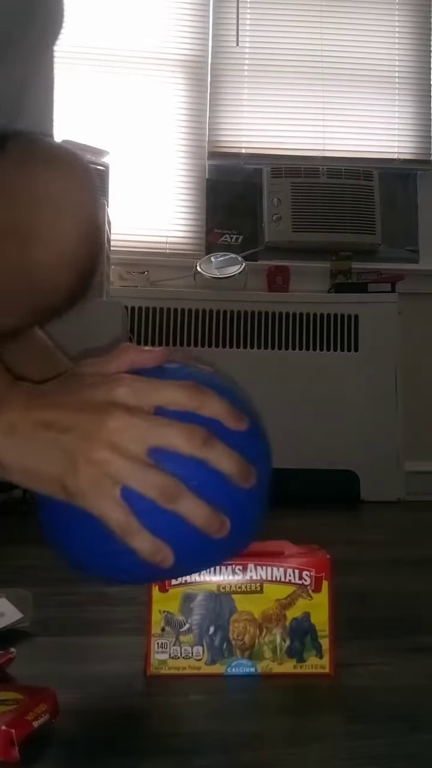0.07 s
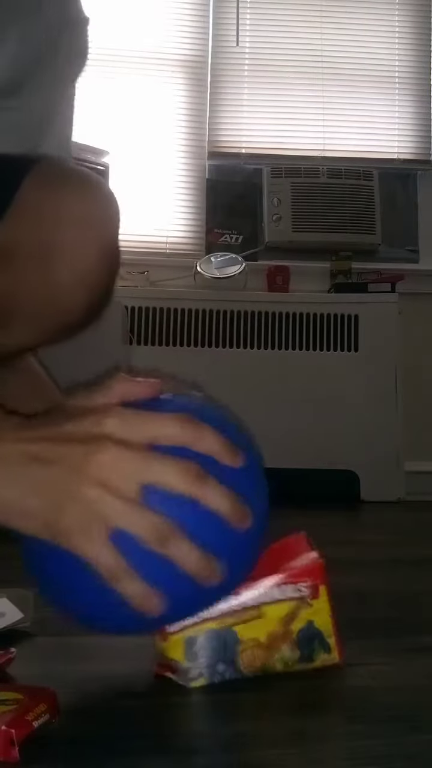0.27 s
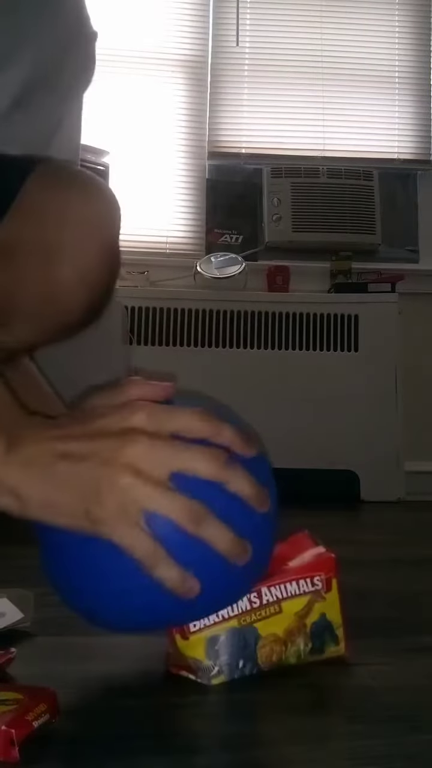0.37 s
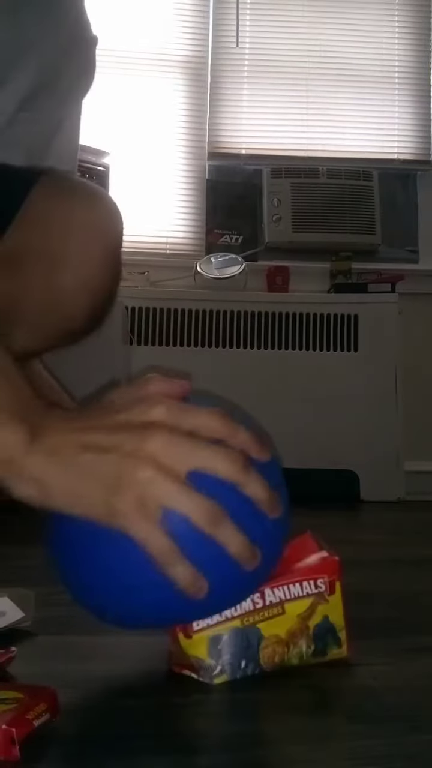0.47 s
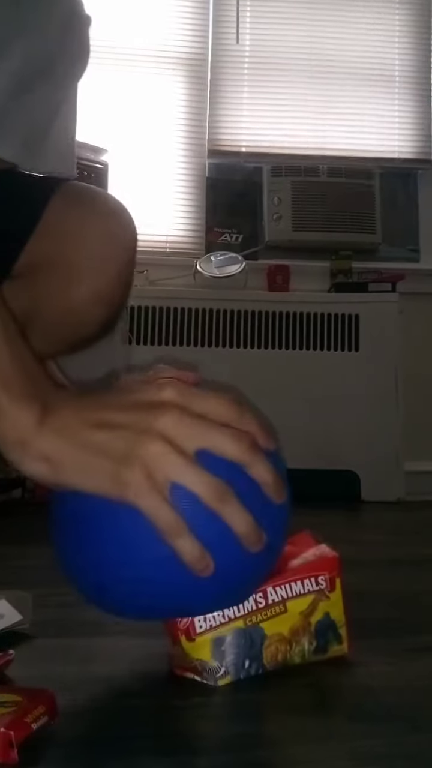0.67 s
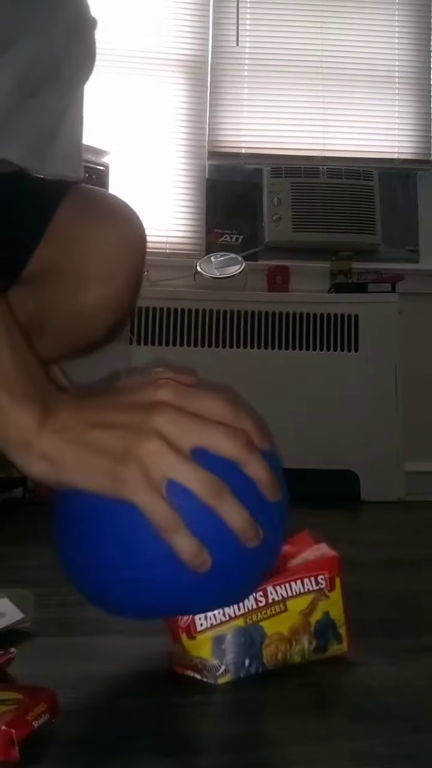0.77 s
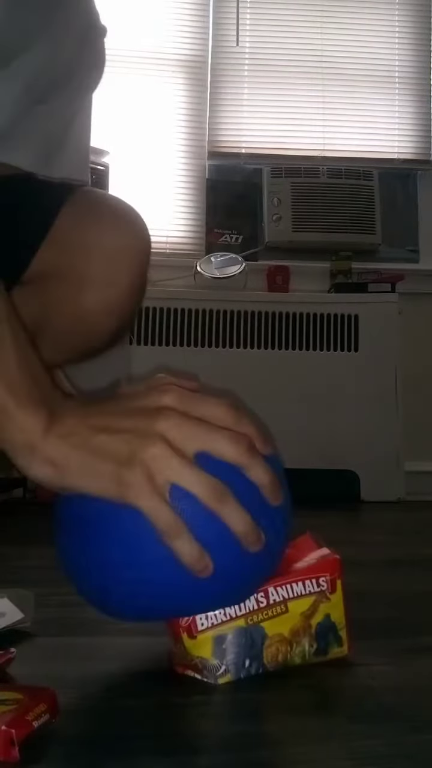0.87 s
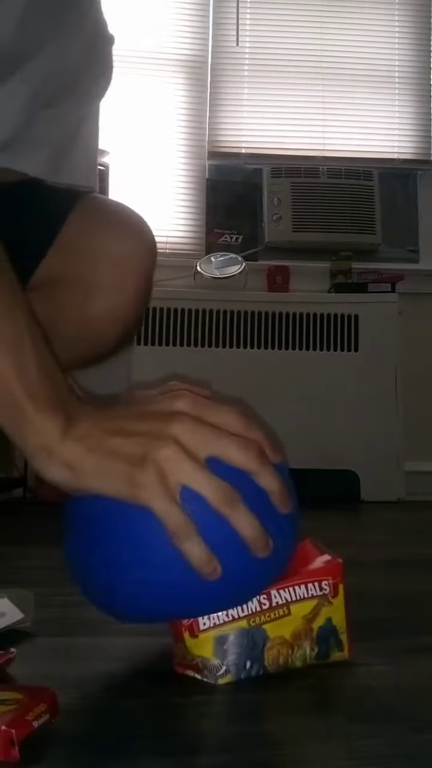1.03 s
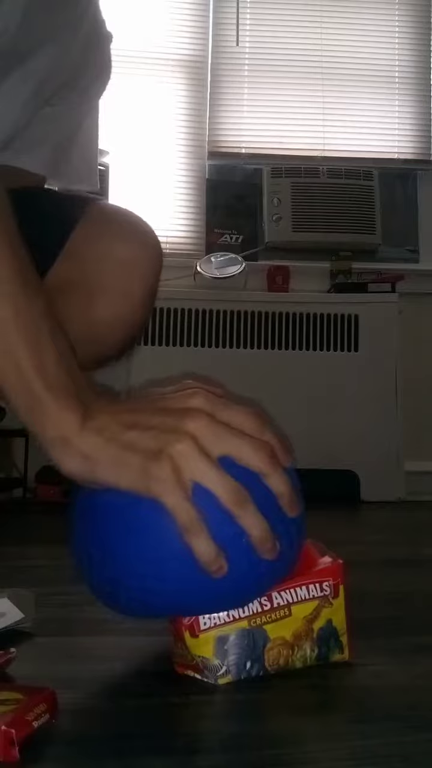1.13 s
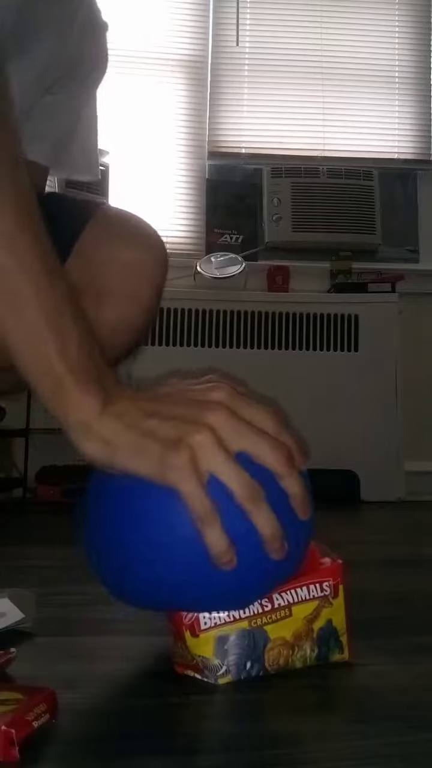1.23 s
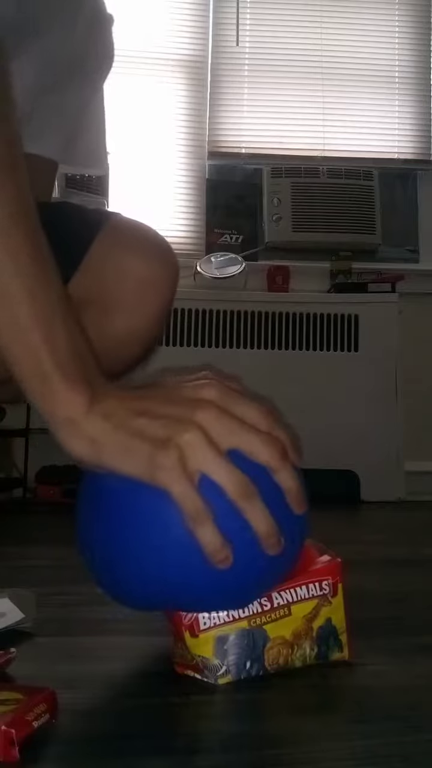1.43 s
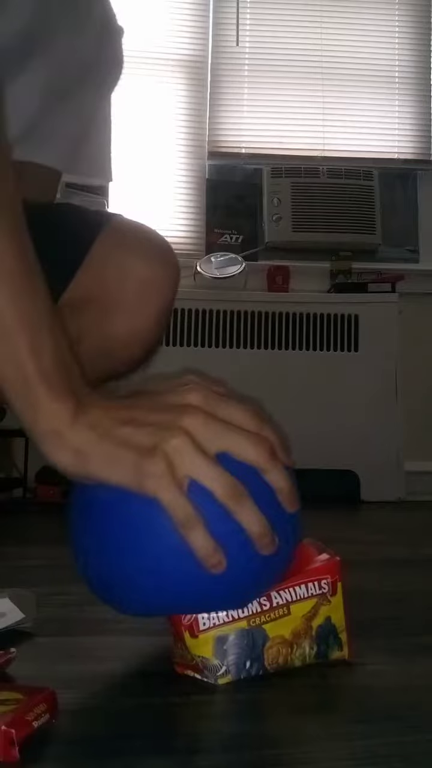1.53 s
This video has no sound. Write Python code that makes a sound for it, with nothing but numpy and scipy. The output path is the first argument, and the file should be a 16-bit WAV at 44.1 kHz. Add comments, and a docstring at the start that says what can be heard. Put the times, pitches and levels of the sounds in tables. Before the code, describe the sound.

A small cardboard box buckles under a rubber ball, close by, with a quick cluster of hollow thumps and crackling creases from about 0.2 to 0.5 seconds. It knocks lightly on the hard floor at 0.6 seconds. The ball bumps it softly just after 1 second, and a stiff flap snaps with small ticks around 1.25 seconds. An air conditioner hums faintly throughout in the small room.

```python
"""A small cardboard box buckles under a rubber ball, close by on a hard floor in a small room.
Its panels give way with hollow thumps while breaking fibres crackle along the creases.
The box tips and knocks on the floor; later the ball bumps it, and a stiff flap slips and snaps.
Behind it all, an air conditioner hums faintly."""
import sys
import numpy as np
from scipy import signal
from scipy.fft import rfft, irfft
from scipy.io import wavfile
from scipy.ndimage import uniform_filter1d

SR = 44100
rng = np.random.default_rng(int(sys.argv[2]) if len(sys.argv) > 2 else 0)


def waveform_to_disk(signal):
    """Save audio, clipped to [-1, 1], as 16-bit WAV at the path in sys.argv[1]."""
    frames = np.transpose(np.atleast_2d(signal))
    scaled = np.clip(frames, -1, 1) * 32767
    samples = np.round(scaled).astype(np.int16)
    wavfile.write(sys.argv[1], SR, samples)


N = 70560
TIME = np.arange(N) / SR


def from_db(db):
    """Decibels to gain."""
    return 10 ** (np.asarray(db) / 20)


def rms_one(x):
    """Scale to rms 1."""
    return x / np.sqrt(np.mean(x ** 2) + 1e-20)


def at_hz(points, hz):
    """Read a curve on a log-frequency axis."""
    f, value = np.transpose(points)
    return np.interp(np.log(np.maximum(hz, 1)), np.log(f), value)


def butter(x, hz, kind, order=2):
    """Causal Butterworth filter."""
    sections = signal.butter(order, np.minimum(hz, .49 * SR), kind, fs=SR, output="sos")
    return signal.sosfilt(sections, x)


def convolve(x, response):
    """Pass a sound through an impulse response."""
    return signal.fftconvolve(x, response)[:N]


def colour(x, spectrum, size=4096):
    """Minimum-phase EQ with the given curve and unit power gain."""
    gains = from_db(at_hz(spectrum, np.fft.rfftfreq(size, 1 / SR)))
    cepstrum = irfft(np.log(gains))
    cepstrum[1:size // 2] *= 2
    cepstrum[size // 2 + 1:] = 0
    response = irfft(np.exp(rfft(cepstrum)))
    return convolve(x, response / np.linalg.norm(response))


def click(at_s):
    """A unit click at the given time."""
    return (np.arange(N) == int(at_s * SR)) + 1e-18


def ring(x, modes):
    """Resonators of alternating polarity; a unit click sets each ringing at its level."""
    out = np.zeros(N)
    for k, (hz, db, t60) in enumerate(modes):
        radius, angle = from_db(-60 / (t60 * SR)), 2 * np.pi * hz / SR
        poles = [1, -2 * radius * np.cos(angle), radius * radius]
        out += (-1) ** k * from_db(db) * signal.lfilter([0, np.sin(angle)], poles, x + 1e-18)
    return out


def swings(rows, rise):
    """A surface gives and springs back: one damped swing per row, its attack `rise` times its decay."""
    out = np.zeros(N)
    for at_s, db, hz, decay_cycles in rows:
        cycles = (TIME - at_s) * hz
        fade = np.maximum(cycles, -cycles / rise) / decay_cycles
        out += from_db(db) * np.sin(2 * np.pi * cycles) * np.exp(-np.minimum(fade, 50))
    return out


def air_conditioner(rush_db=-57, waver_depth=0.44, waver_hz=6.1):
    """A steady bed of rushing air with a few wavering motor tones."""
    # colour of the rush: f/Hz, relative level/dB
    rush_eq = [(25, -22), (45, -11), (65, -10), (115, -7.5), (200, 0.5), (320, -8.5), (420, -4), (520, -11),
               (670, -8.5), (950, -12.5), (1200, -13.5), (1700, -17.5), (2300, -18), (4800, -24.5),
               (8000, -36), (13900, -49.5)]
    # motor hum: f/Hz, rms level/dB
    motor_tones = [(119, -64.5), (176, -76), (238, -68.5), (665, -70.5), (856, -75.5), (1083, -69)]
    out = from_db(rush_db) * colour(rng.standard_normal(N), rush_eq)
    for hz, db in motor_tones:
        waver = rms_one(butter(rng.standard_normal(2 * N), waver_hz, "low")[N:])
        tone = np.sin(2 * np.pi * (hz * TIME + rng.random()))
        out += from_db(db) * rms_one((1 + waver_depth * waver) * tone)
    return out


def room(send, predelay_s=0.00088, build_s=0.0042, hold_s=0.05):
    """Diffuse reflections build up quickly, hold briefly and die away band by band."""
    # colour of the reverb: f/Hz, level/dB
    tail_eq = [(50, 0), (130, 0.5), (250, -2), (500, -0.5), (720, 0), (1000, -6.5), (1400, 0), (3000, -4),
               (6000, -0.5), (10000, -13.5), (13000, -5.5)]
    # reverb time: f/Hz, t60/s
    tail_t60 = [(60, 0.19), (150, 0.3), (600, 0.28), (2000, 0.27), (5000, 0.26), (13000, 0.074)]
    edges_hz = np.geomspace(40, 16000, 14)
    white, response = rng.standard_normal((2, N)), np.zeros(N)
    build = 1 - np.exp(-np.maximum(TIME - predelay_s, 0) / build_s)
    for k, (low, high) in enumerate(zip(edges_hz, edges_hz[1:])):
        hz = np.sqrt(low * high)
        decay = from_db(-60 * np.maximum(TIME - hold_s, 0) / at_hz(tail_t60, hz))
        tail = butter(white[k % 2], [low, high], "band") * build * decay
        gain = from_db(at_hz(tail_eq, hz)) * np.sqrt(2 * (high - low) / SR)
        response += gain * tail / np.linalg.norm(tail)
    return convolve(send, response)


def stereo_room(direct, send, width_db=-4.5, wide_above_hz=4670, scatter_s=.003):
    """Add reverb and air conditioner; all is centred, with only the treble scattered to the sides."""
    mid = direct + room(send) + air_conditioner()
    scatter = rng.standard_normal(N) * np.exp(-np.minimum(TIME / scatter_s, 50))
    diffuse = convolve(direct, scatter / np.linalg.norm(scatter)) + room(send) + air_conditioner()
    side = from_db(width_db) * butter(diffuse, wide_above_hz, "high", order=16)
    return np.array([mid + side, mid - side])


def ball_bumps():
    """The soft ball bumps and rubs on the box; one knock rings its skin and the air inside."""
    # soft contacts: t/s, level/dB, f/Hz, decay/cycles
    contacts = [(.16, -54, 75, 1), (.256, -24.5, 104, 0.61), (.303, -29.5, 100, 1.1),
                (.335, -25.5, 130, 1.64), (.385, -28.5, 129, 2), (.46, -32.5, 129, 3.6),
                (.515, -31.5, 126, 1.8), (.735, -45.5, 230, 4.8), (.885, -51.5, 436, 8.5),
                (1.0508, -26, 158, 0.43), (1.0592, -33.5, 242, 2.2), (1.0785, -32, 146, 0.64),
                (1.101, -40.5, 126, 1.4), (1.135, -49.5, 71, 1.1)]
    # ring of the ball: f/Hz, level/dB, t60/s
    ball_modes = [(252, -46, 0.31), (1786, -54, 0.11), (2310, -57, 0.13), (2840, -63, 0.13),
                  (3300, -60, .06), (4450, -53.5, 0.055)]
    return swings(contacts, rise=0.59) + ring(click(at_s=1.0478), ball_modes)


def box_drop():
    """The tipped box drops back on the floor and rings hollow."""
    # hollow knock: f/Hz, level/dB, t60/s
    box_modes = [(317.4, -36, 0.16), (415, -38.5, 0.11), (503, -43, .07), (701, -35, 0.086),
                 (810, -41, 0.1), (1234, -46, 0.043), (1720, -44.5, 0.036)]
    return ring(click(at_s=.5897), box_modes)


def flap_snap(click_gain_db=5.5, jitter_s=.00003, grit_db=-30, grit_decay_s=0.022):
    """A quick run of slips, each trailing a rasp of fibres, rings the stiff flap."""
    # slips that make up the snap: t/s, relative level/dB, low-pass f/Hz
    slips = [(1.23877, -17.5, 1200), (1.2426, -7.5, 2500), (1.24498, -7, 5600), (1.2463, -5, 5970),
             (1.2475, -5.5, 9100), (1.2487, -4, 13900), (1.2501, -10.5, 10000)]
    # ring of the flap: f/Hz, level/dB, t60/s
    flap_modes = [(321, -44.5, 0.11), (754.5, -45, 0.16), (755, -31.5, 0.041), (1012, -32, 0.036),
                  (1072, -52, 0.35), (1084, -50, 0.34), (1466, -46, 0.033), (1580, -58.5, .15),
                  (1930, -57.5, 0.12), (2835, -38, 0.037), (3330, -32, 0.0053), (3890, -37, 0.022),
                  (4450, -33.5, 0.02), (4770, -27, 0.007), (5900, -46.5, 0.031), (7700, -33.5, 0.0022),
                  (9517, -33, 0.0029), (10700, -38, 0.0052), (12465, -42, 0.0016)]
    clicks, rasp = np.zeros(N), np.zeros(N)
    for at_s, db, cutoff_hz in slips:
        slip = click(at_s + jitter_s * rng.normal())
        clicks += from_db(db + click_gain_db) * butter(slip, cutoff_hz, "low")
        rasp += from_db(db) * (TIME > at_s) * np.exp(-np.clip((TIME - at_s) / grit_decay_s, 0, 50))
    grit = from_db(grit_db) * rasp / rasp.max() * rng.standard_normal(N)
    return ring(clicks + grit, flap_modes)


def crease_crackle(fibres_per_s=7000, spread_db=3, attack_s=0.00084, shelf_hz=4970):
    """Fibres break in dense, uneven clicks; each burst starts sharply, fades and rings the creases."""
    # creases giving way: t/s, level/dB, decay/s, treble shelf/dB
    bursts = [(0.233, -29, 0.0092, -21), (0.2395, -18.5, 0.0037, -2), (0.26, -27.5, 0.02, -23),
              (0.291, -45, 0.017, 17), (0.3067, -28, 0.0047, 4), (0.3106, -21.5, 0.0015, 3),
              (0.317, -32, 0.0071, 10.5), (0.3253, -30, 0.0016, 13), (.335, -62, 0.009, 2),
              (.364, -44.5, 0.027, 17.5), (0.393, -50, 0.0066, 9), (0.411, -51.5, 0.0045, 19),
              (0.4265, -26, 0.0038, 8), (.466, -46.5, .03, 1), (0.5927, -51, 0.021, 8),
              (0.618, -64, 0.012, 8), (1.048, -46.5, 0.0038, 0), (1.065, -56, 0.013, -8),
              (1.196, -51.5, 0.0034, 6.5), (1.2225, -51, 0.0036, 7), (1.242, -51, 0.0025, 5),
              (1.265, -47, 0.0054, 12), (1.283, -49, 0.0023, 4)]
    # colour of the crackle: f/Hz, relative level/dB
    cardboard_eq = [(100, -13), (400, 10.5), (720, 10), (900, 4), (1250, 0.5), (1700, 0), (2400, -3.5),
                    (3200, -2), (4300, -10), (5800, -11.5), (7500, -12), (10000, -20.5), (14000, -31)]
    # ring of the stiff creases: f/Hz, level/dB, t60/s
    crease_modes = [(1421, -51.5, 0.19), (1840, -61, 0.21), (2920, -61, 0.15), (4760, -49.5, 0.074),
                    (7450, -57, 0.12)]
    sizes = from_db(spread_db * np.minimum(rng.exponential(1, N), 4)) * rng.choice([-1, 1], N)
    clicks = sizes * (rng.random(N) < fibres_per_s / SR)
    # level the clicks so that the bursts set the dynamics
    clicks /= np.sqrt(np.abs(uniform_filter1d(clicks ** 2, size=200)) + 1e-6)
    fibres = colour(clicks, cardboard_eq)
    dull = butter(fibres, shelf_hz, "low", order=1)
    treble = fibres - dull
    crackle = np.zeros(N)
    for at_s, db, decay_s, treble_db in bursts:
        age = TIME - at_s
        fade = np.maximum(-age / attack_s, age / decay_s)
        envelope = np.exp(-np.minimum(fade, 50))
        crackle += from_db(db) * envelope * (dull + from_db(treble_db) * treble)
    return crackle + ring(crackle, crease_modes)


def body_ring(thumps, gain_db=-25.5):
    """The box and the floor under it ring on after each thump."""
    # box and floor resonances: f/Hz, relative level/dB, t60/s
    body_modes = [(102, -52, 0.56), (135.7, -43, 0.4), (176.9, -29, 0.36), (272.5, -44, 0.42),
                  (320.2, -32, 0.44), (366.6, -44, .5), (410, -36, 0.41), (447.4, -35.5, 0.43),
                  (521, -39.5, 0.47), (566.4, -36, 0.26), (642, -37, 0.25), (678, -34.5, 0.48),
                  (751, -30.5, 0.39), (841, -34, 0.16), (978, -37, 0.42), (1134, -37, 0.37),
                  (1182, -37, 0.3), (1254, -31, 0.38)]
    return from_db(gain_db) * ring(thumps, body_modes)


def panel_thumps():
    """Cardboard panels buckle, crack or knock on the floor in short, damped swings."""
    # panel hits: t/s, level/dB, f/Hz, decay/cycles
    hits = [(.2356, -20.5, 434, 0.55), (.2399, -12, 191.4, 0.65), (.2408, -13, 544, 0.61),
            (.2397, -14.5, 1213, 1.27), (.2405, -26, 7090, 6.7), (.2655, -11, 513, 0.72),
            (.2864, -14.5, 420, 0.5), (.2907, -14, 580, 0.56), (.3084, -9.5, 380, 0.42),
            (.3115, -18.5, 3420, 3), (.3253, -19.5, 1067, 2.4), (.3660, -22.5, 445, 1.3),
            (.412, -36, 4900, 12), (.4287, -2.5, 532, 0.41), (.4287, -16.5, 274, 0.45),
            (.4288, -26.5, 3080, 1.8)]
    return swings(hits, rise=0.78)


def scene():
    """Box, ball and flap sound in the room, over the air conditioner."""
    thumps = panel_thumps()
    # mix: sound, reverb send/dB
    layers = [(thumps, -3.5), (box_drop(), -22), (ball_bumps(), -17),
              (crease_crackle(), 0), (flap_snap(), -15.5)]
    direct = body_ring(thumps) + sum(sound for sound, _ in layers)
    send = sum(from_db(send_db) * sound for sound, send_db in layers)
    return stereo_room(direct, send)


def record(dry, low_cut_hz=43.5, high_cut_hz=13900):
    """The small microphone loses the deep bass; the top is cut steeply."""
    thin = butter(dry, low_cut_hz, "high")
    return signal.sosfilt(signal.ellip(10, .3, 70, high_cut_hz, fs=SR, output="sos"), thin)


dry = scene()
out = record(dry)
waveform_to_disk(out)
```